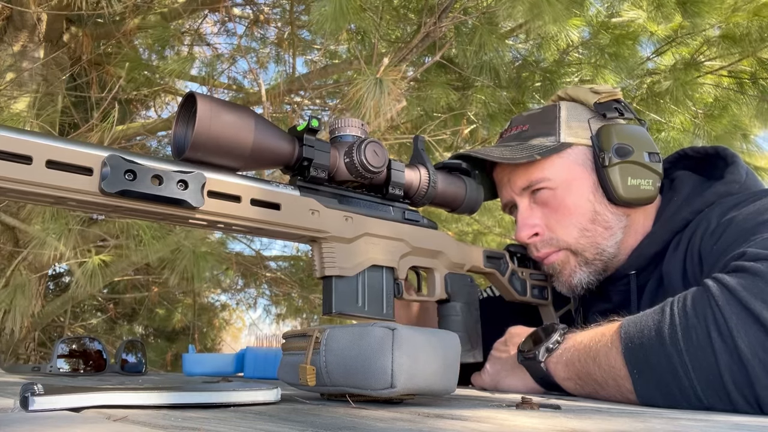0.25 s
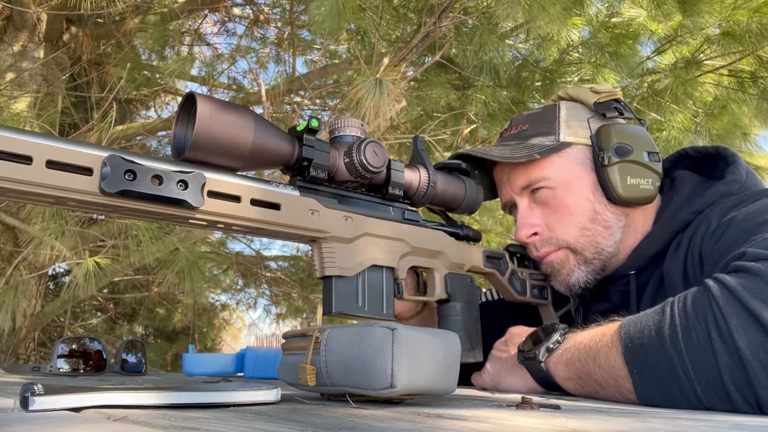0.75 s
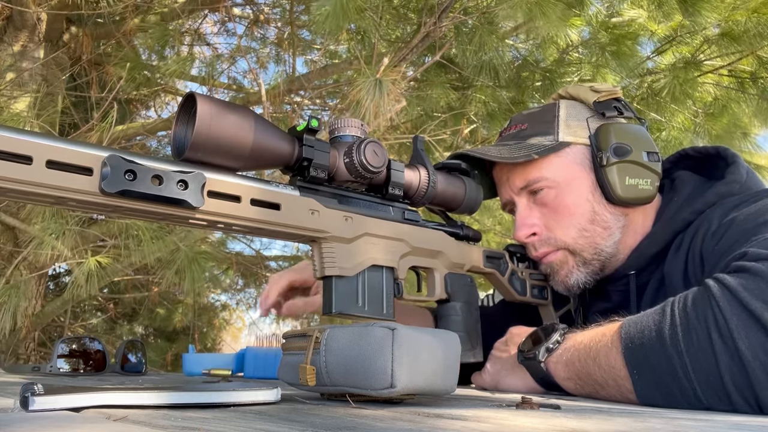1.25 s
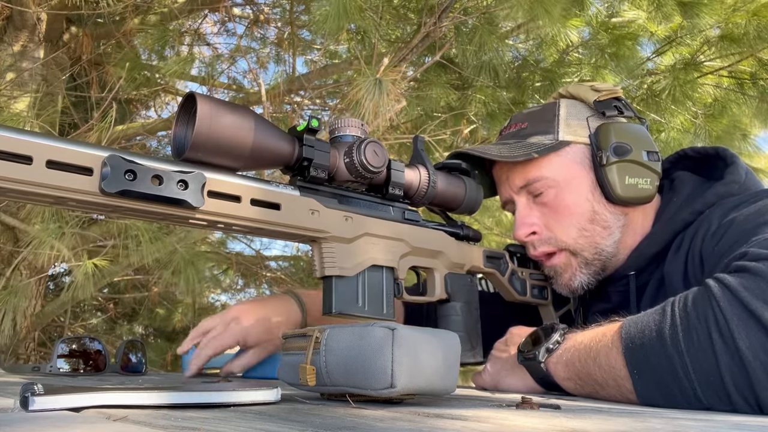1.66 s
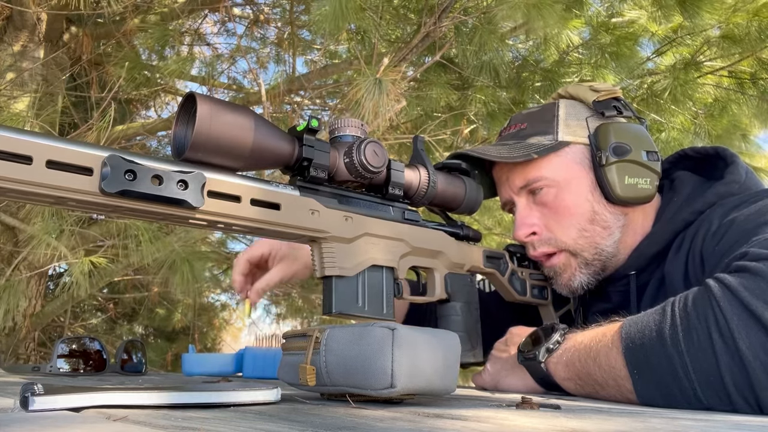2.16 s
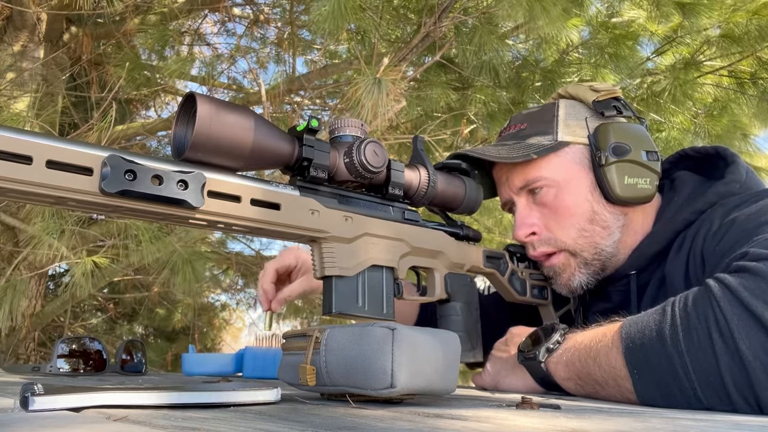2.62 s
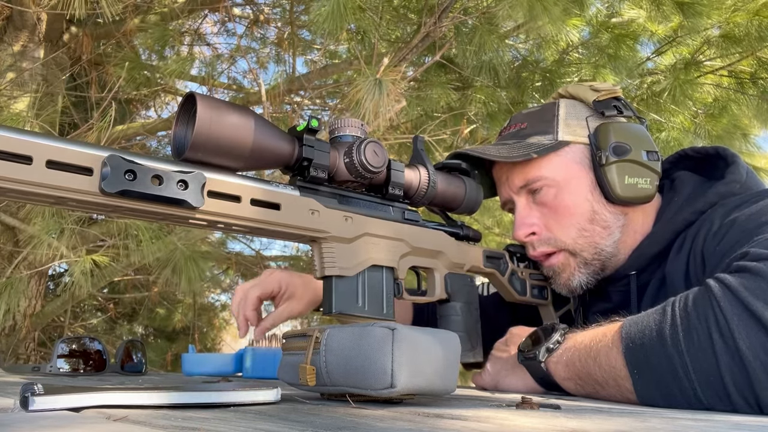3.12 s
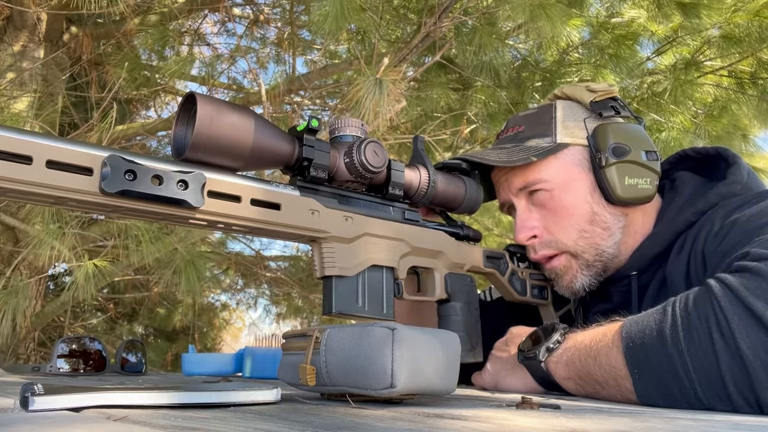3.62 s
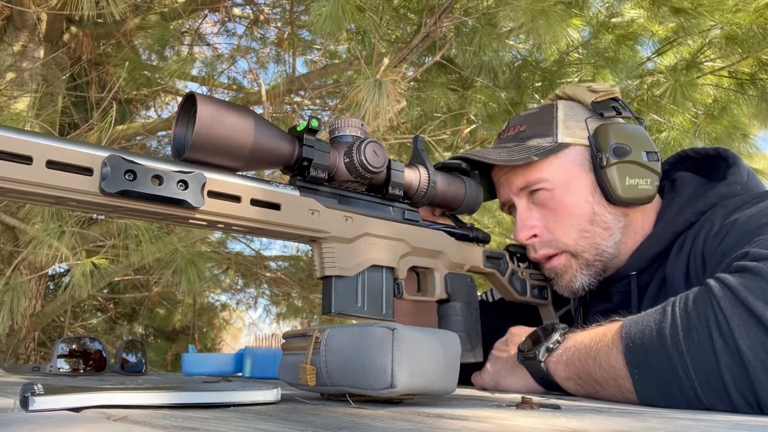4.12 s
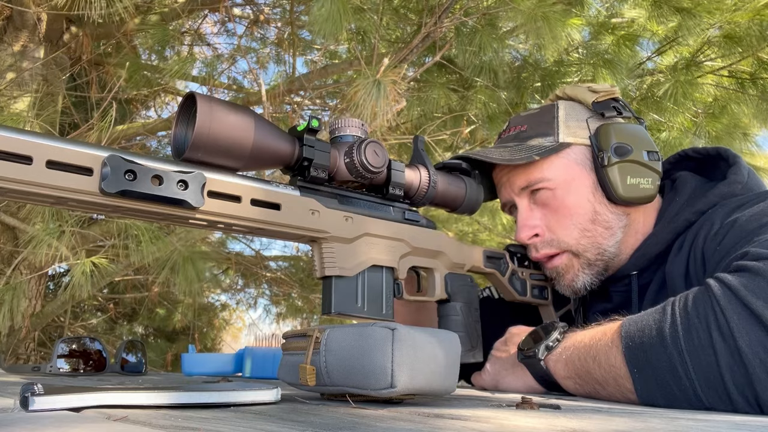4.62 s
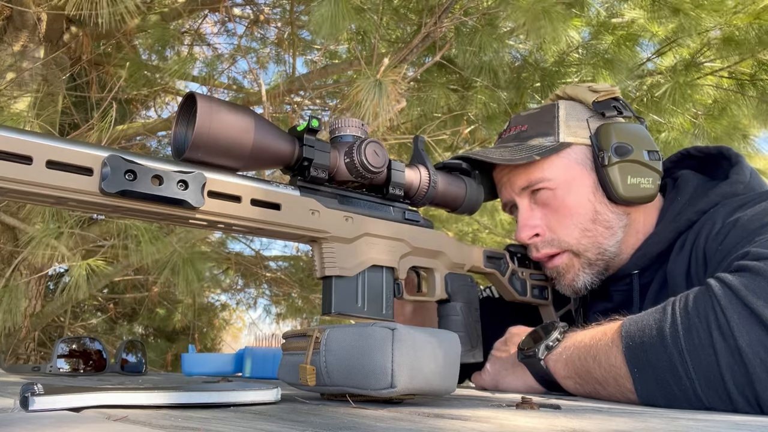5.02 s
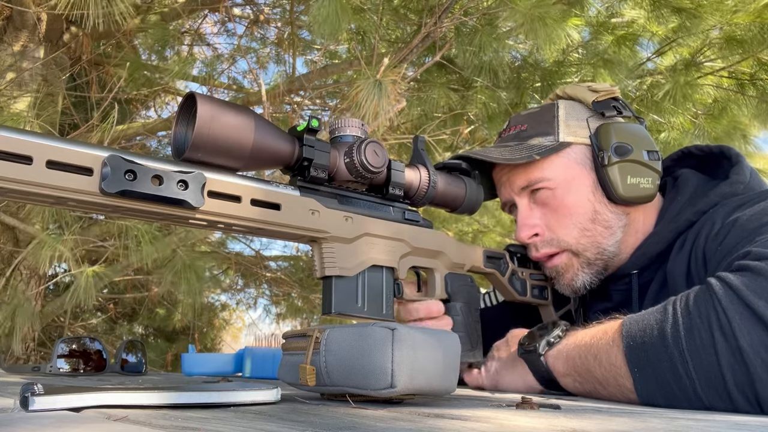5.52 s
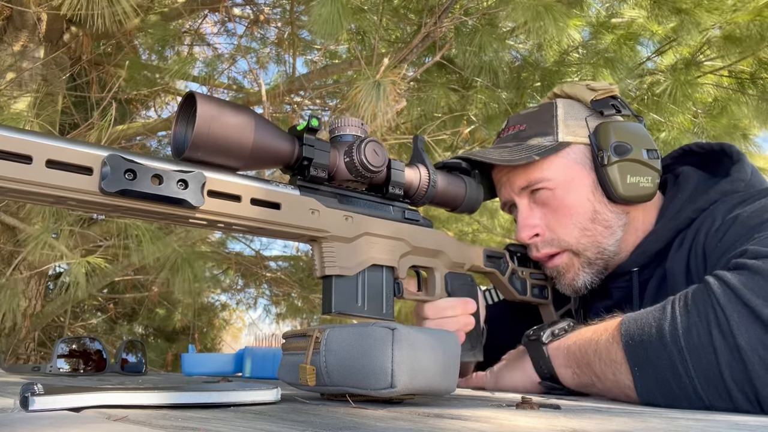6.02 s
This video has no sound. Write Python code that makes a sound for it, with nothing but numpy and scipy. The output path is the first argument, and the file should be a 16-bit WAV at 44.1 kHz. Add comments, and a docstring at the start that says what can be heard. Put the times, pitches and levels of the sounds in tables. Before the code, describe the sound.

A rifle bolt is snapped open, a spent case bounces on wooden boards, a round is fetched and the bolt clacks shut, with faint birds outdoors.

```python
"""Bolt-action rifle on a wooden table

The bolt is lifted and drawn back, the spent case bounces on the boards, a fresh round is picked from a
plastic box, laid in the action, pushed home and locked. Birds call among the pines, over a low drone.
Blows and knocks are bursts of noise that ring the modes (natural tones) of the rifle or table; rubbing is
a stream of tiny hits or shaped noise; cases, bird calls and drone are sine waves; far notes, air and rumble
are filtered noise. The trees add a thin tail of scattered sound.
"""
import sys
import numpy as np
from scipy import signal
from scipy.fft import rfft, irfft, next_fast_len
from scipy.io import wavfile
from scipy.ndimage import uniform_filter1d

SR = 44100
rng = np.random.default_rng(int(sys.argv[2]) if len(sys.argv) > 2 else 0)


def master_out(mix):
    """Clip the mix to full scale and print it as 16-bit PCM to the path in sys.argv[1]."""
    frames = np.transpose(np.atleast_2d(mix))
    ceiling = np.clip(frames, -1, 1)
    pcm = np.round(ceiling * 32767).astype(np.int16)
    wavfile.write(sys.argv[1], SR, pcm)


N = 276286   # length of the scene in samples
TIME = np.arange(N) / SR   # seconds
SPAN = 12000   # usual length of a ringing response, in samples
LEAD = 882   # samples (20 ms) left ahead of a hit for the contact to build up

# Natural tones of the rifle: (frequency [Hz], width [Hz], relative level [dB])
RIFLE_MODES = [(104, 11, -1), (184.4, 13, -12), (290, 6.9, -5.5), (382, 170, 0), (470, 140, -3.5),
               (680.6, 47, -0.5), (729, 85, 0.5), (874.4, 64, 6), (860, 33, -7.5), (887, 2.8, -15.5),
               (1114, 110, -7), (1440, 1100, -4.5), (1980, 210, 1.5), (2406, 23, -15.5), (2670, 7.9, -8.5),
               (3147, 290, 3), (3530, 57, 1), (3820, 190, -1), (3950, 7, -8.5), (4560, 57, -8.5),
               (5090, 190, 6.5), (6220, 220, 2.5), (5700, 16, -6), (7020, 430, -5.5), (7800, 480, -2.5),
               (9140, 1700, -9.5), (11870, 770, -8), (12400, 380, -16)]
# Pitch ranges of the rifle, thud to crack: (low [Hz], high [Hz])
RIFLE_RANGES = [(75, 250), (250, 580), (580, 1100), (1100, 7000), (7000, 14300)]
# Natural tones of the table and what lies on it: (frequency [Hz], width [Hz], relative level [dB])
TABLE_MODES = [(278, 140, -5), (448, 290, -7), (860, 170, -1.5), (1230, 180, 2.5), (1540, 350, 1),
               (2220, 920, -11.5), (3320, 500, -9.5), (4270, 290, -14.5), (5600, 370, -10.5),
               (8180, 5400, -42.5), (11200, 2400, -45)]
# Pitch ranges of the table, board to edge: (low [Hz], high [Hz])
TABLE_RANGES = [(170, 650), (650, 2200), (2200, 5000), (5000, 12500)]


def action():
    """Each blow rings the steel; its weight drives the stock, and strong or light blows crack brightest."""
    # Metal blows as the bolt is lifted and drawn back, the round laid in, pushed home and locked:
    # (time [s], contact build-up [ms], steel level [dB], hollow clank re steel [dB], weight re steel [dB])
    blows = [(0.1812, 0.92, -44.5, 4, -2.5), (0.31, 4.2, -35, 2, -3), (0.4426, .5, -40.5, -1.5, -4.5),
             (0.4635, 5, -32.5, -7.5, -8), (0.482, 4.7, -28, -9.5, -12), (0.5, 1.3, -19.5, -22.5, -16.5),
             (0.534, 4, -28.5, -21, -22), (0.56, 3, -32, -5, -4.5), (0.576, 1.1, -31.5, -8.5, -12),
             (0.6235, 2, -27, -1, -27), (0.636, 2, -26.5, 9.5, -16.5), (3.778, 2, -68, 11.5, 11.5),
             (3.871, 3.2, -15.5, 2.5, -15.5), (3.915, .9, -17.5, -3.5, -4.5), (3.989, 1.9, -58.5, 1.5, 15),
             (4.249, 2, -44, -0.5, -3.5), (4.2831, 3.1, -31, -5.5, -29.5), (4.296, 3, -38.5, 3.5, -8.5),
             (4.3376, 2, -52.5, 9, 2.5), (4.417, 1.5, -53, 15, -3.5), (4.5021, 1.4, -22, -2.5, -17.5),
             (4.5212, 3, -18, -2, -22.5), (4.526, 6.6, -18, -8.5, -20.5), (4.545, 8, -24.5, -7, -15),
             (4.602, 7, -31.5, -10, -23.5), (4.671, 5.7, -29, -1.5, -10), (4.774, 2.7, -58.5, 10, 7.5),
             (4.903, 2, -73, 21, -3), (5.0248, 1.3, -14, -9, -14.5), (5.0743, 1.4, -27, -28, -26.5),
             (5.2275, 2, -26.5, 5, -3.5)]
    typical_steel_db, typical_weight_db = -28, -11
    out = np.zeros((2, N))
    thud, knock, clank, steel, crack = [body(RIFLE_MODES, *edges) for edges in RIFLE_RANGES]
    for s, rise_ms, steel_db, hollow_db, weight_db in blows:
        strength_db = steel_db - typical_steel_db
        lightness_db = typical_weight_db - weight_db
        crack_db = -7.5 + 0.094 * strength_db + 0.3 * lightness_db   # re the steel
        sound = from_db(weight_db) * strike(thud, rise_ms, 32, -16.5, 14, apart=0.92)
        sound += from_db(weight_db) * strike(knock, rise_ms, 0.8, -2.5, 13, apart=0.7)
        sound += from_db(hollow_db) * strike(clank, rise_ms, 1.0, -16, 14, apart=0.04)
        sound += strike(steel, rise_ms, 1.7, -8, 11, apart=0.45)
        sound += from_db(crack_db) * strike(crack, rise_ms * 0.7, 2.0, -22, 24, apart=0.35)
        add(out, s - LEAD / SR, from_db(steel_db) * sound)
    return out


def slide():
    """The bolt rasps along its raceway and chatters faintly after each stroke."""
    # Bolt drawn back, round nudged, bolt pushed home, short rattle after the locking blow, handle turned down:
    # (start [s], end [s], friction level at the start [dB], at the end [dB])
    slides = [(.445, .605, -40.5, -34.5), (.62, .662, -32.5, -30.5), (4.17, 4.28, -65.5, -45.5),
              (4.425, 4.535, -51, -29), (4.565, 4.682, -36, -36.5), (5.027, 5.06, -35.5, -45.5),
              (5.11, 5.22, -60.5, -52)]
    attack_s, release_s = 0.007, 0.011
    tail_db, tail_s = -20, 0.05
    rub = strokes(slides, attack_s, release_s)
    chatter = from_db(tail_db) * strokes(slides, attack_s, tail_s)
    friction = np.maximum(rub, chatter)
    gains_db = [-13, 1.5, -0.5, -15.5]   # knock, clank, steel, crack
    rasp = scrape(RIFLE_MODES, RIFLE_RANGES[1:], gains_db, per_s=1500, grain_db=0.5, apart=0.2)
    return friction * rasp


def spent_case():
    """The spent case bounces on the boards, with a small jiggle after each bounce, slightly to the left."""
    # Bounces: (time [s], strength [dB], hardness [dB])
    bounces = [(0.8317, -24.5, -6), (0.868, -29.5, 3.5), (0.9227, -27, -1), (0.9455, -33, -1),
               (0.974, -35, 2.5), (0.9821, -34, -1), (1.0062, -46, -2.5), (1.0222, -45, -2),
               (1.0724, -31.5, 1), (1.087, -43, -5), (1.158, -33.5, 10.5)]
    # How a bounce drives the board, hollow, tick and edge ranges:
    # (level re strength [dB], change per dB of hardness [dB/dB])
    bounce_drive = [(-3, -0.84), (3, -1), (-6, 0.72), (-19, 0.86)]
    return panned(table(bounces, bounce_drive) + rattle(bounces), 0.66)


def plastic_box():
    """Hand and rounds knock on the plastic box and the loose brass jiggles, a little to the right."""
    # Knocks: (time [s], strength [dB], hardness [dB])
    knocks = [(1.5629, -41, 10), (1.5968, -49.5, -2), (1.666, -68, -26), (1.727, -55.5, -4),
              (1.839, -54.5, -4), (1.855, -45, -2), (1.8635, -38.5, -12), (2.8993, -42, 5), (2.908, -39, 5),
              (2.945, -37.5, -3), (2.954, -40, -5.5), (3.0202, -53, -12), (3.06, -51, 0.5),
              (3.066, -47.5, 0.5), (3.108, -58, -1.5), (3.1835, -26, -7), (3.2275, -29.5, -1.5),
              (3.24, -43.5, -11), (3.292, -60.5, -15), (3.325, -59, -13.5)]
    # How a knock drives the board, hollow, tick and edge ranges:
    # (level re strength [dB], change per dB of hardness [dB/dB])
    knock_drive = [(-1.5, -.8), (.5, -.1), (0, .8), (-14, .8)]
    return panned(table(knocks, knock_drive) + rattle(knocks), -2)


def table(hits, drive):
    """Short dead knocks on the boards and the plastic box; hard contacts tick, soft ones thump."""
    out = np.zeros((2, N))
    board, hollow, tick, edge = [body(TABLE_MODES, *edges, size=2500) for edges in TABLE_RANGES]
    rise_ms, fall_ms = 0.65, 1.15
    for s, strength_db, hardness_db in hits:
        levels_db = [strength_db + db + slope * hardness_db for db, slope in drive]
        board_db, hollow_db, tick_db, edge_db = levels_db
        sound = from_db(board_db) * strike(board, rise_ms, fall_ms, -9.0, 14, apart=0.58)
        sound += from_db(hollow_db) * strike(hollow, rise_ms, fall_ms, -13, 11, apart=0.99)
        sound += from_db(tick_db) * strike(tick, rise_ms, fall_ms, -24.5, 23, apart=1.0)
        sound += from_db(edge_db) * strike(edge, rise_ms, fall_ms, -27.0, 14, apart=0.71)
        add(out, s - 0.0005 - LEAD / SR, sound)   # half a millisecond early: the boards peak after the touch
    return out


def rattle(hits):
    """Loose brass, tossed by each hit, lands a moment later and jiggles to rest."""
    delay_s, rise_s, fall_s, level_db = 0.014, 0.004, 0.054, -21   # level re the hit
    landings = [(s + delay_s, db + level_db) for s, db, _ in hits]
    gains_db = [6.0, -2.5, -20.0, -19.5]   # board, hollow, tick, edge
    jiggle = scrape(TABLE_MODES, TABLE_RANGES, gains_db, per_s=490, grain_db=2.5, apart=1.0)
    return after_hits(landings, rise_s, fall_s) * jiggle


def brass():
    """A thin brass case rings with one high note when it is flicked."""
    # Rings of the cases: (time [s], pitch [Hz], relative level [dB], time to fall by 60 dB [s])
    pings = [(.5, 14300, -33, .08), (.5755, 14010, -28, .11), (.923, 13950, -48, .1),
             (.973, 14050, -48, .12), (4.2808, 5800, -13, .02), (4.2832, 5810, -5, .028),
             (4.284, 5800, -45, .15)]
    out, t = np.zeros(N), TIME[:SPAN]
    for s, hz, db, t60 in pings:
        fade = from_db(db - 60 * t / t60)
        soft_start = 1 - np.exp(-t / 0.0004)
        add(out, s, fade * soft_start * np.sin(2 * np.pi * hz * t))
    return from_db(-9) * out


def out_of_step(x):
    """Left and right are set out of step, by an amount that varies with pitch."""
    # Phase lead of the left side over the right: (frequency [Hz], lead [radians])
    phase_lead = [(100, 1.5), (700, 0.35), (1800, 1.24), (3200, 0.91), (4600, 2), (6200, 4), (9000, 3),
                  (11000, -1.47), (12500, 1.35), (15000, -4)]
    size = next_fast_len(N + SPAN)
    turn = np.exp(1j * per_bin(phase_lead, size) * np.array([[0.5], [-0.5]]))
    return irfft(rfft(x, size) * turn, size)[:, :N]


def bird():
    """Nearly pure whistles, each a little different in pace and pitch, flutter through the branches."""
    # Calls: (time [s], basic pitch [Hz], relative level [dB])
    calls = [(.035, 2980, -66), (.835, 3020, -62), (1.1, 3015, -54), (1.34, 3015, -72), (2.255, 2960, -71),
             (2.52, 2995, -68), (2.695, 3020, -63), (2.975, 3020, -58), (3.25, 2995, -53),
             (3.51, 3015, -59), (5.41, 3030, -67), (5.675, 2995, -58), (5.83, 3070, -64),
             (5.945, 2990, -62), (6.1, 2995, -63)]
    # Main whistle and faint after-note of each call, before small changes of pace:
    # (delay [s], pitch ratio, hold [s], downward slur [s], level re the call [dB])
    notes = [(0, 1, .041, .07, -5.5), (.124, .915, .014, .05, -12)]
    slur_to, slur_fade_db = 0.745, -9.5   # pitch ratio and fade at the bottom of the slur
    edge_s = 0.012   # soft start and end
    out, t = np.zeros(N), TIME[:round(0.2 * SR)]
    for start, hz, db in calls:
        own = t * (1 + 0.035 * rng.standard_normal())   # this call's own pace
        for delay, ratio, hold_s, slur_s, note_db in notes:
            waver, flutter = rms_one(uniform_filter1d(rng.standard_normal((2, len(t))), size=400))
            slur = np.sin(np.pi / 2 * np.clip((own - hold_s) / slur_s, 0, 1)) ** 2   # 0 to 1
            pitch = hz * (1 + 0.003 * waver) * (ratio + (slur_to - ratio) * slur)
            phase = 2 * np.pi * np.cumsum(pitch) / SR
            time_left = hold_s + slur_s + edge_s - own
            edges = np.clip(np.minimum(own, time_left) / edge_s, 0, 1)
            level = from_db(db + note_db + slur_fade_db * slur + 2.4 * flutter)
            add(out, start + delay, edges * level * np.sin(phase))
    return out


def far_notes():
    """Other birds hold notes that distance blurs into narrow bands of noise."""
    # Held notes: (time [s], length [s], pitch [Hz], width [Hz], level before soft edges [dB])
    notes = [(2.03, .36, 1380, 300, -71), (2.64, .26, 2480, 40, -73), (3.65, .14, 2440, 30, -70)]
    out = np.zeros(N)
    for s, length, hz, width_hz, db in notes:
        limits = [hz - width_hz / 2, hz + width_hz / 2]
        band = signal.butter(2, limits, "band", fs=SR, output="sos")
        hum = signal.sosfilt(band, rng.standard_normal(SR))
        note = rms_one(hum[-round(length * SR):])   # the end, where the filter has settled
        add(out, s, from_db(db) * signal.windows.tukey(len(note), 0.5) * note)
    return out


def trees(x, t60):
    """Trunks and needles scatter a thin, fading tail of noise-like echoes back to each side."""
    # Colour of the scattered sound: (frequency [Hz], relative level [dB])
    tree_colour = [(60, -10), (300, 10), (900, 5.5), (3000, -4.5), (6000, -9), (8000, -20.5), (15000, -25)]
    t = TIME[:2 * SPAN]
    tail = coloured(rng.standard_normal((2, len(t))), tree_colour)
    tail = tail * from_db(-60 * t / t60) * (1 - np.exp(-t / 0.004))
    echo = rms_one(tail) / np.sqrt(len(t))
    return signal.fftconvolve(np.atleast_2d(x), echo, axes=1)[:, :N]


def sleeve():
    """A sleeve brushes the table: cloth-coloured noise whose level flutters with the folds."""
    # Brushes: (start [s], end [s], level at the start [dB], at the end [dB])
    brushes = [(0, .08, -55, -61), (.2, .4, -68.5, -61.5), (1.535, 1.58, -61, -58), (1.64, 1.9, -71, -68),
               (5.48, 5.8, -59, -68), (6.08, 6.25, -67, -73)]
    # Colour of the cloth: (frequency [Hz], relative level [dB])
    cloth = [(300, 12), (800, -0.5), (1400, 0), (2500, -8.5), (4800, -7), (7000, -20), (12000, -21.5),
             (15000, -27)]
    folds = from_db(3.3 * rms_one(uniform_filter1d(rng.standard_normal(N), size=400)))
    pressure = strokes(brushes, attack_s=0.027, release_s=0.065)
    return pressure * folds * coloured(stereo_noise(N, apart=0.94), cloth)


def rumble():
    """Low noise: a steady rumble of air, stronger when the rifle is jolted and rocks on its bag."""
    # Jolts: (time [s], level [dB])
    jolts = [(.045, -37), (.21, -43), (.5, -37.5), (.87, -39.5), (3.2, -44.5), (3.95, -37), (4.38, -37.5),
             (4.55, -40), (4.71, -40), (5.265, -35), (6.24, -48)]
    # Colour of the rumble: (frequency [Hz], relative level [dB])
    rumble_colour = [(20, -37.5), (40, -7.5), (60, 0.5), (85, 0.5), (130, -19.5), (200, -21.5),
                     (400, -41.5), (1000, -67.5)]
    rocking = after_hits(jolts, rise_s=0.038, fall_s=0.065)
    level = np.hypot(from_db(-57.5), rocking)
    return level * coloured(stereo_noise(N, apart=0.44), rumble_colour)


def drone():
    """A far drone: one low sine wave that wavers slightly in pitch and slowly fades."""
    waver = rms_one(uniform_filter1d(rng.standard_normal(N), size=6000))
    pitch = 112.8 + 0.63 * waver   # Hz
    level = from_db(-59 - 2.2 * TIME) * np.sqrt(2)   # starts at -59 dB rms, loses 2.2 dB each second
    return level * np.sin(2 * np.pi * np.cumsum(pitch) / SR)


def air():
    """Quiet outdoor air: steady noise with its own colour."""
    # Colour of the air: (frequency [Hz], relative level [dB])
    air_colour = [(60, -7), (130, -0.5), (200, -13.5), (400, -21.5), (600, -26.5), (800, -20.5),
                  (1350, -18), (2000, -32), (2800, -25.5), (4000, -39), (5500, -41.5), (8000, -46),
                  (11000, -42.5), (16000, -66.5)]
    return from_db(-64.5) * coloured(stereo_noise(N, apart=1.0), air_colour)


def body(modes, low, high, size=SPAN):
    """Responses to a tap, one row for each mode in a pitch range; wider modes die away sooner."""
    t = TIME[:size]
    rings = []
    for k, (hz, width, db) in enumerate(modes):
        if low <= hz < high:
            fade = width * np.exp(-np.pi * width * t)
            rings.append((-1) ** k * from_db(db) * fade * np.cos(2 * np.pi * hz * t))
    band = signal.butter(3, [low * 0.85, high * 1.12], "band", fs=SR, output="sos")
    return signal.sosfilt(band, rings)


def strike(rings, rise_ms, fall_ms, rattle_db, rattle_ms, apart):
    """Rough faces grind into contact, part, and rattle on briefly; the energy is that of 10 ms at rms 1."""
    ms = (TIME[:9 * LEAD] - TIME[LEAD]) * 1000
    after = np.maximum(ms, 0)
    approach = np.exp(np.minimum(ms, 0) / rise_ms)
    parting = np.exp(-after / fall_ms) + from_db(rattle_db) * np.exp(-after / rattle_ms)
    force = approach * parting
    # every point of contact favours other modes
    response = from_db(2.8 * rng.standard_normal(len(rings))) @ rings
    sound = signal.fftconvolve(force * stereo_noise(len(ms), apart), response[None], axes=1)
    return rms_one(sound) * np.sqrt(SR / 100 / sound.shape[1])


def scrape(modes, ranges, gains_db, per_s, grain_db, apart):
    """A stream of tiny uneven catches that excite the modes of a body; rms 1."""
    sizes = from_db(grain_db * np.minimum(rng.exponential(1, N), 4))
    catches = (rng.random(N) < per_s / SR) * sizes
    response = 0
    for db, edges in zip(gains_db, ranges):
        response = response + from_db(db) * rms_one(body(modes, *edges, size=6000).sum(axis=0))
    grains = catches * stereo_noise(N, apart)
    return rms_one(signal.oaconvolve(grains, response[None], axes=1)[:, :N])


def swell(start, end, attack_s, release_s):
    """Gain that rises to 1 at the start, holds, and dies away after the end."""
    rise = np.minimum(TIME - start, 0) / attack_s
    fall = np.maximum(TIME - end, 0) / release_s
    return np.exp(np.maximum(rise - fall, -30))


def strokes(rows, attack_s, release_s):
    """Gain of rubbing strokes whose level in dB changes evenly from start to end."""
    gains = []
    for start, end, start_db, end_db in rows:
        pressure = from_db(np.interp(TIME, [start, end], [start_db, end_db]))
        gains.append(pressure * swell(start, end, attack_s, release_s))
    return np.max(gains, axis=0)


def after_hits(rows, rise_s, fall_s):
    """Gain of a motion that each hit stirs up and that then settles."""
    return np.sqrt(sum((from_db(db) * swell(s, s, rise_s, fall_s)) ** 2 for s, db in rows))


def from_db(db):
    """Turn decibels into gain."""
    return 10 ** (np.asarray(db) / 20)


def rms_one(x):
    """Scale a sound to rms 1 (rms is its average strength)."""
    return x / np.sqrt(np.mean(x ** 2) + 1e-30)


def per_bin(points, size):
    """Read a table over log frequency at each frequency step of a Fourier transform."""
    hz, value = np.transpose(points)
    bins_hz = np.arange(size // 2 + 1) * SR / size
    return np.interp(np.log(bins_hz + 1), np.log(hz), value)


def coloured(x, spectrum):
    """Make some pitches of a noise louder than others; rms 1."""
    length = x.shape[-1]
    size = next_fast_len(length)
    shaped = irfft(rfft(x, size) * from_db(per_bin(spectrum, size)), size)
    return rms_one(shaped[..., :length])


def stereo_noise(size, apart):
    """White noise, common to both sides but for a share that differs."""
    mid, side = rng.standard_normal((2, size))
    return mid + apart * side * np.array([[1], [-1]])


def panned(x, pan_db):
    """Make the left side louder than the right by so many dB."""
    return x * from_db(pan_db * np.array([[0.5], [-0.5]]))


def add(out, s, sound):
    """Mix in a sound at a time in seconds."""
    at = max(0, round(s * SR))
    out[..., at:at + sound.shape[-1]] += sound[..., :N - at]


def scene():
    """Rifle, table and box are close; the birds are deep in the trees."""
    rifle = action() + slide()
    near = out_of_step(rifle + spent_case() + plastic_box()) + brass()
    whistles = bird() + far_notes()
    scattered = trees(from_db(-31.5) * near + from_db(-11) * whistles, t60=0.39)
    background = sleeve() + rumble() + drone() + air()
    return near + scattered + whistles + background


def record(dry):
    """The highest peaks are rounded and the top of the treble is cut."""
    rounded = 1.1 * np.tanh(dry / 1.1)
    low_pass = signal.butter(14, 14700, fs=SR, output="sos")   # cutoff in Hz
    return signal.sosfilt(low_pass, rounded)


dry = scene()
out = record(dry)
master_out(out)
```